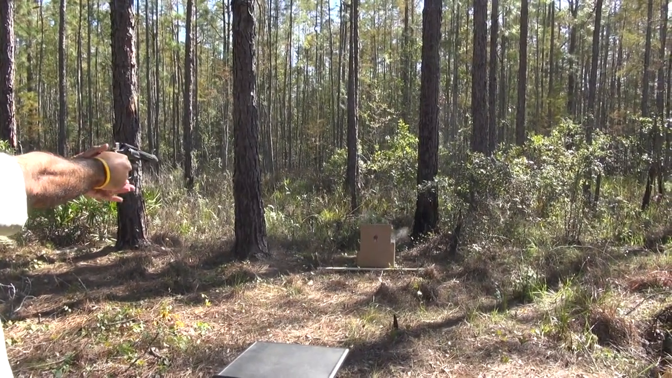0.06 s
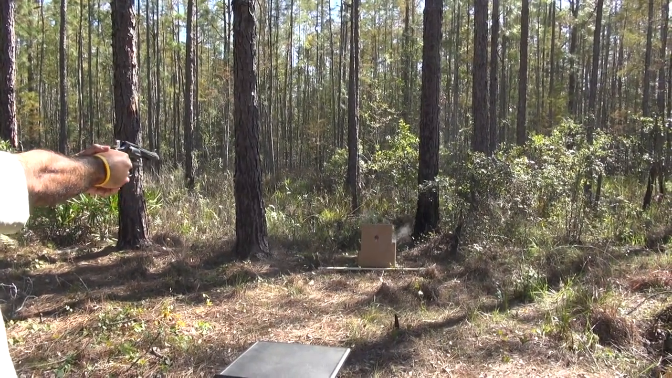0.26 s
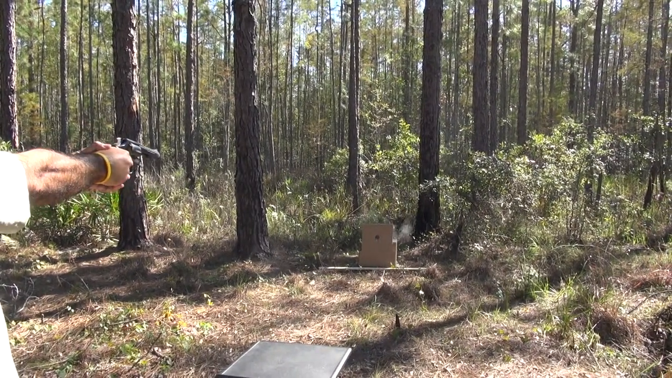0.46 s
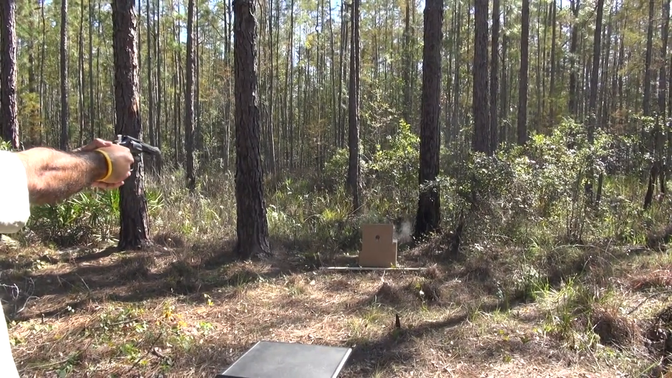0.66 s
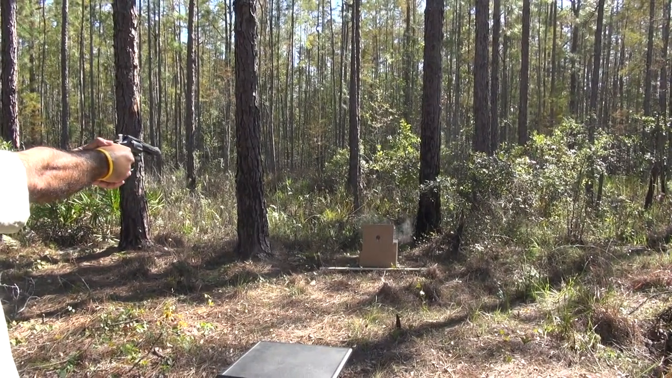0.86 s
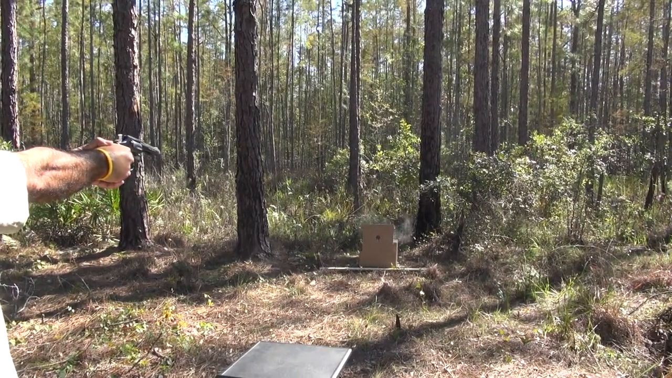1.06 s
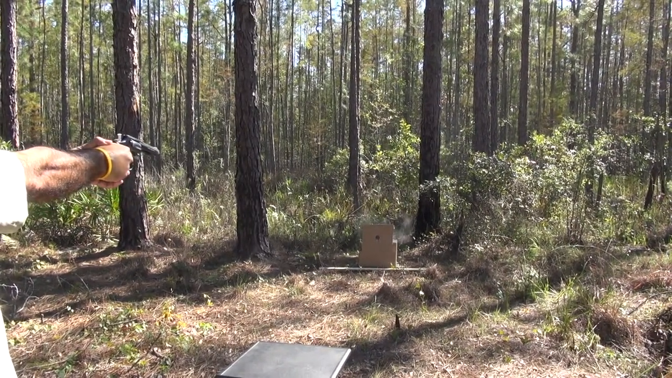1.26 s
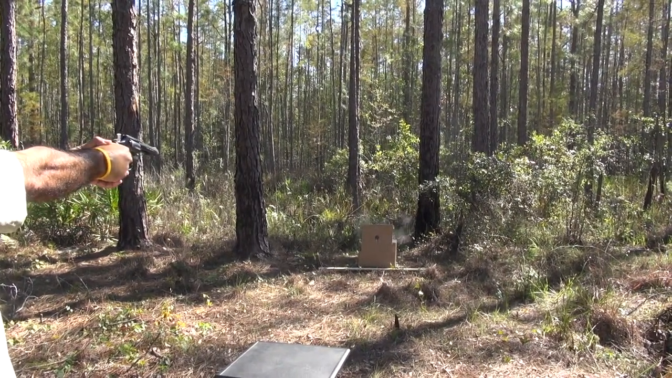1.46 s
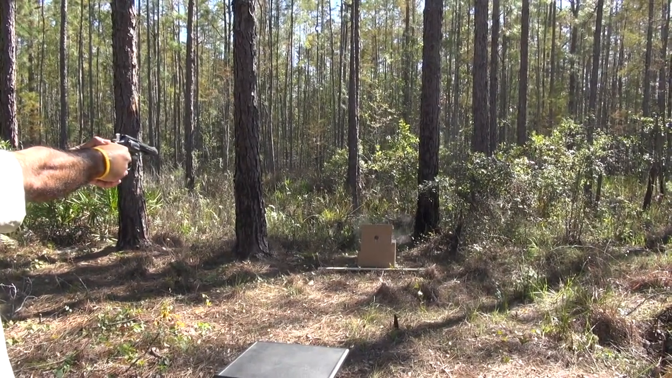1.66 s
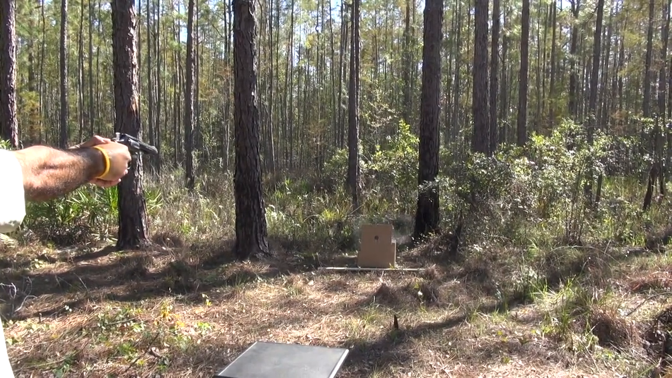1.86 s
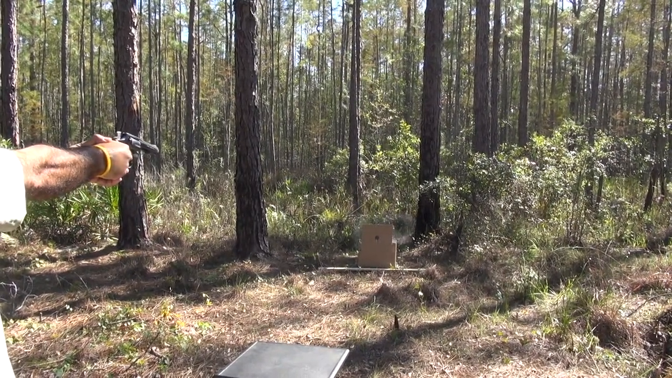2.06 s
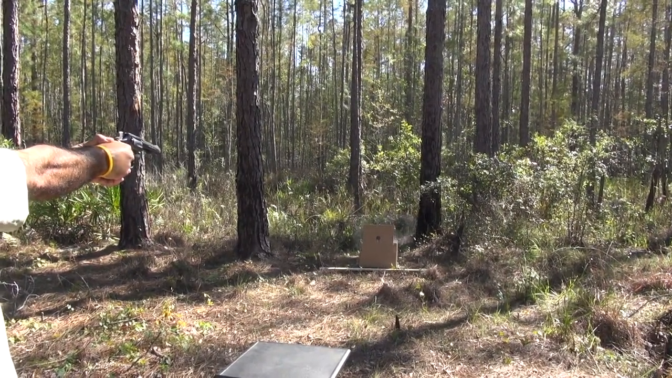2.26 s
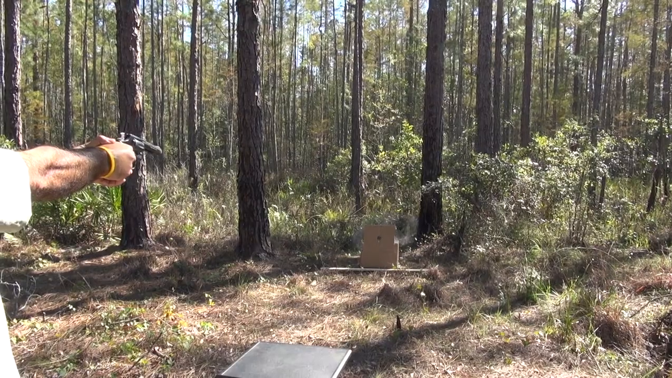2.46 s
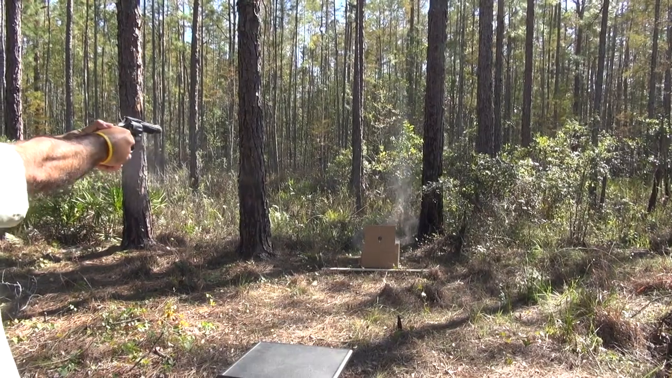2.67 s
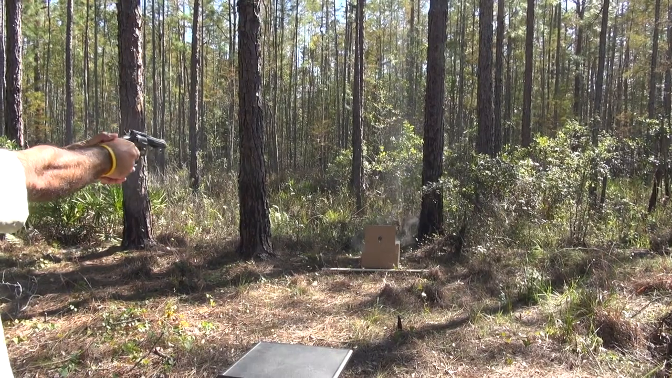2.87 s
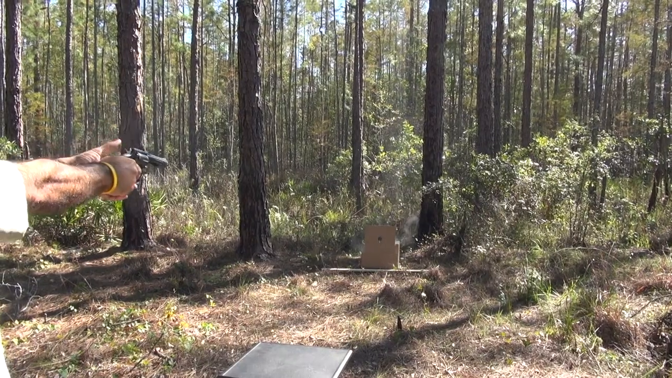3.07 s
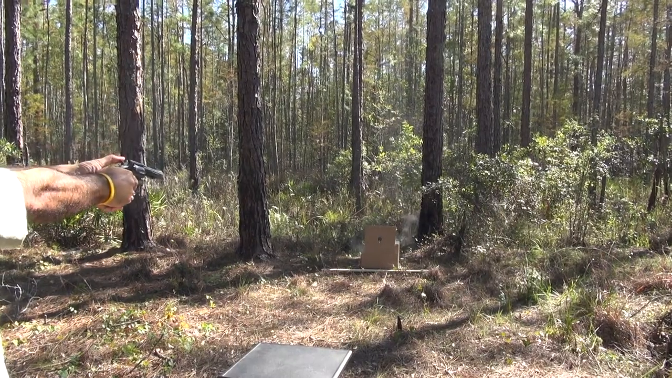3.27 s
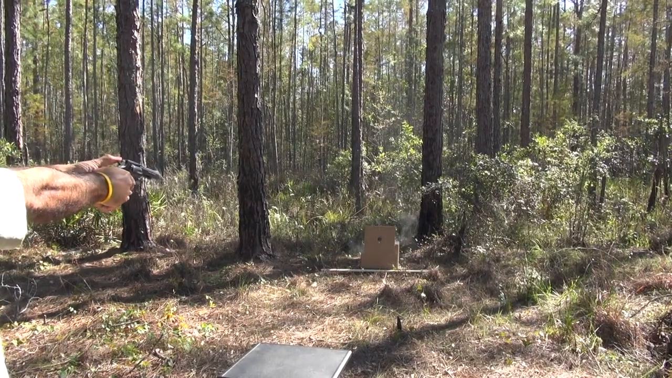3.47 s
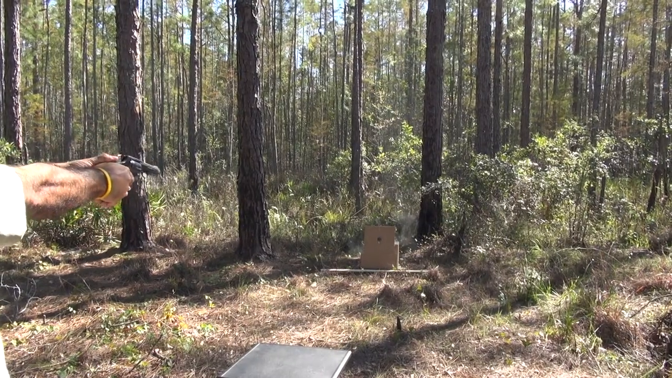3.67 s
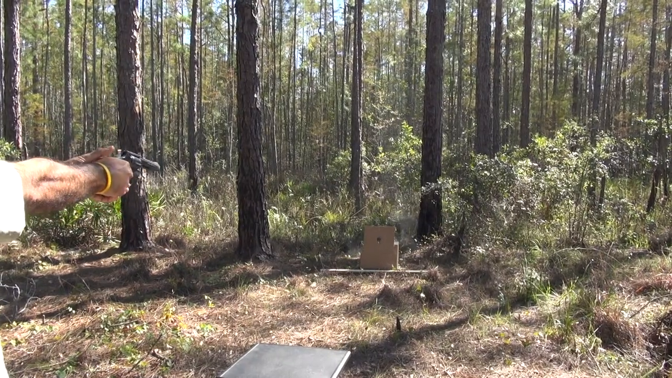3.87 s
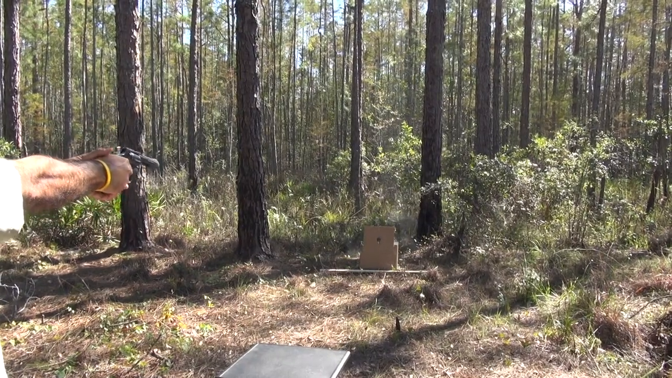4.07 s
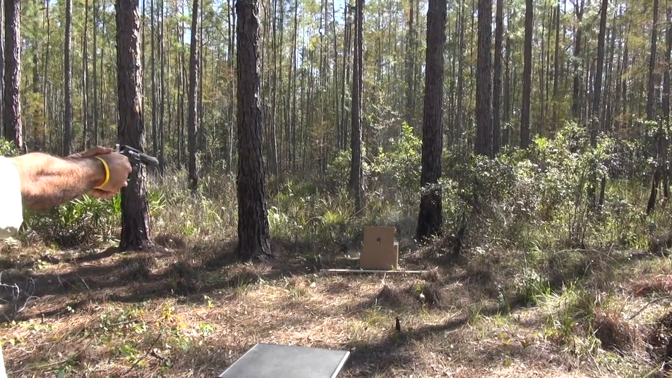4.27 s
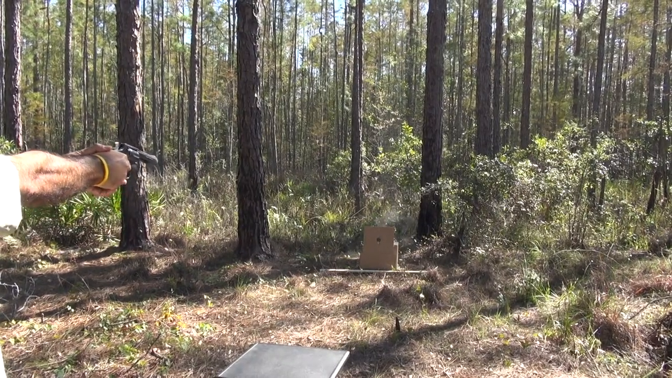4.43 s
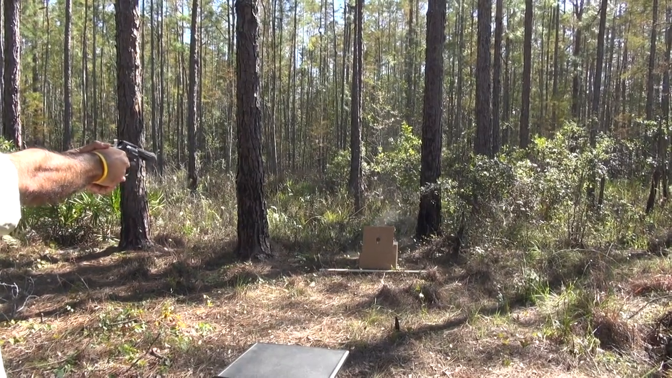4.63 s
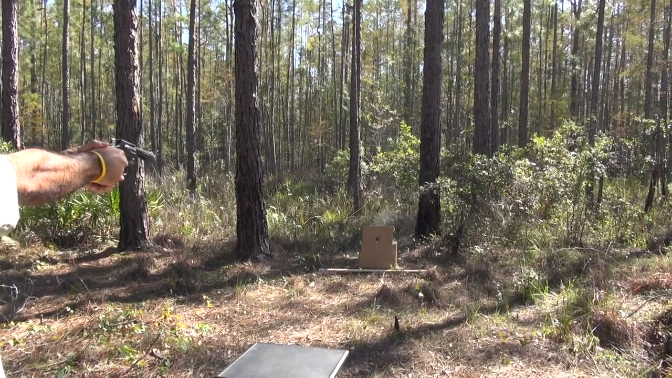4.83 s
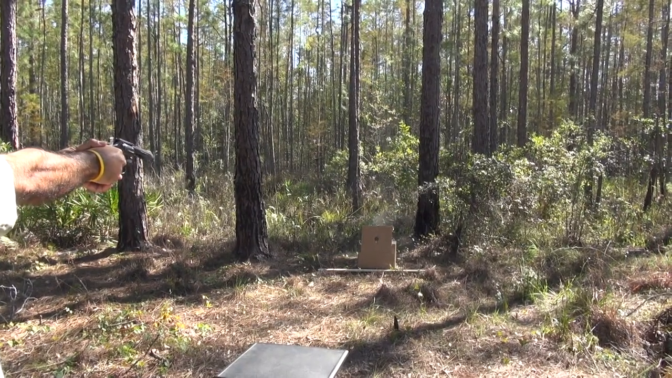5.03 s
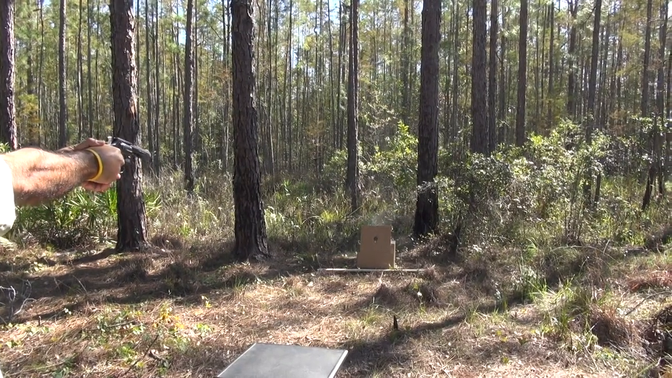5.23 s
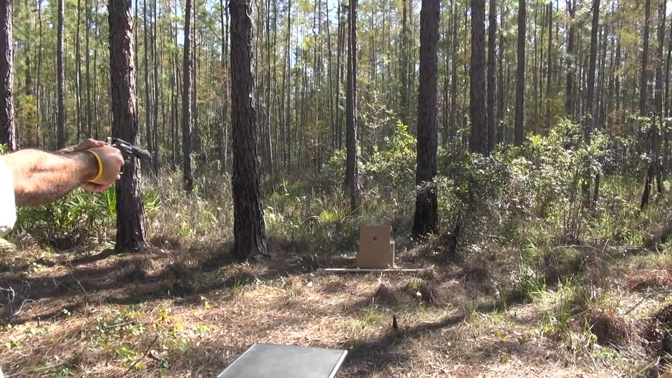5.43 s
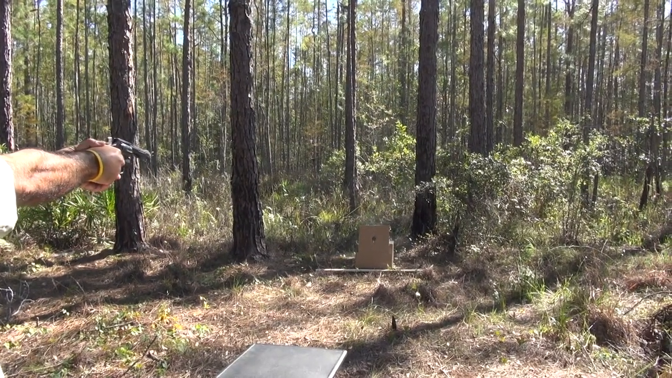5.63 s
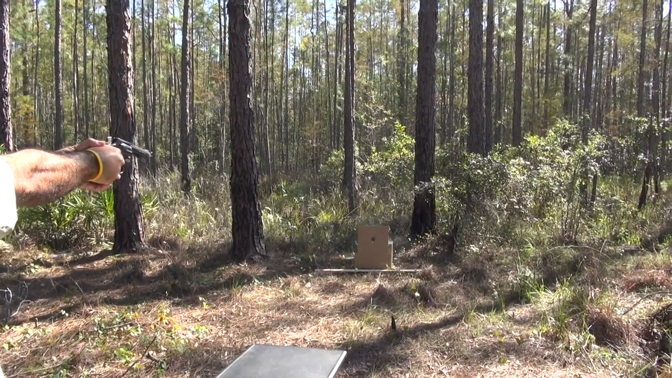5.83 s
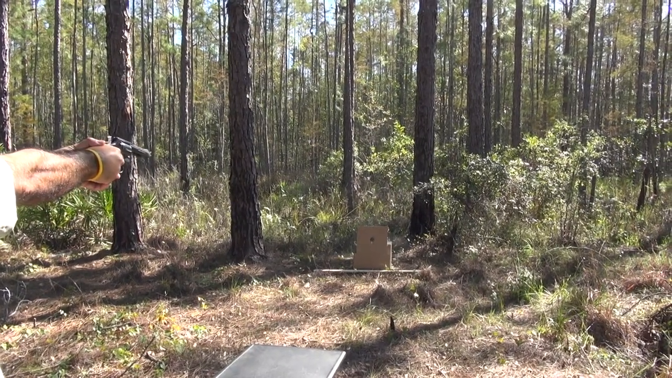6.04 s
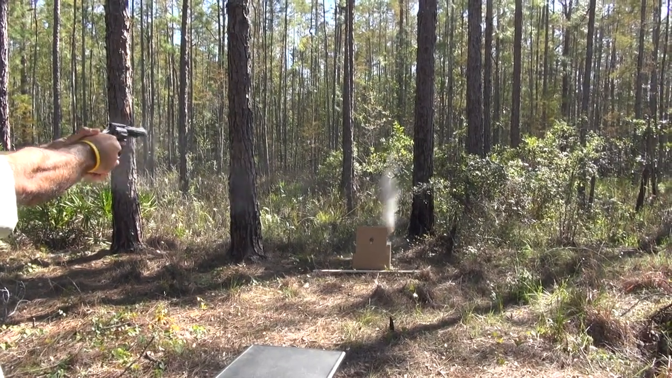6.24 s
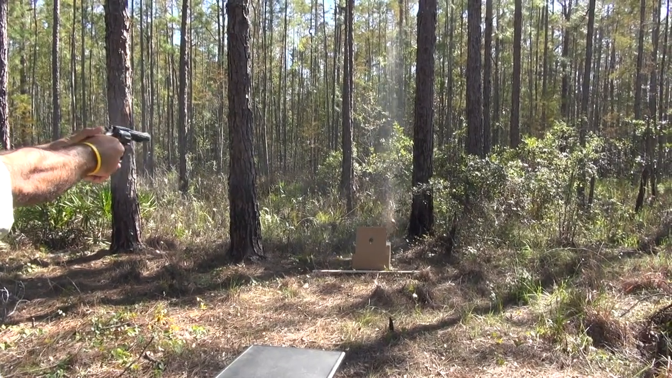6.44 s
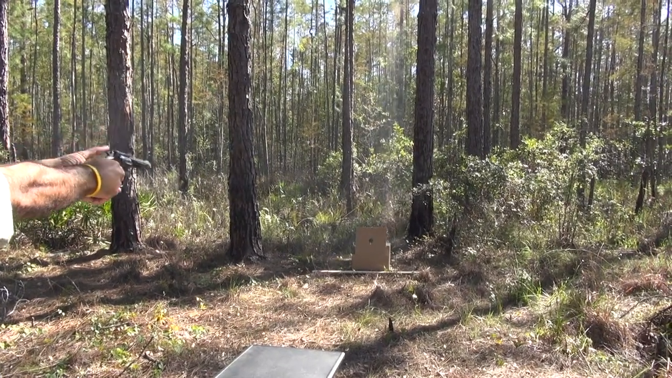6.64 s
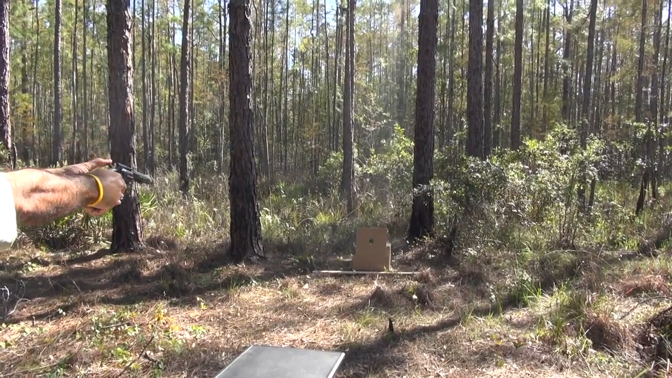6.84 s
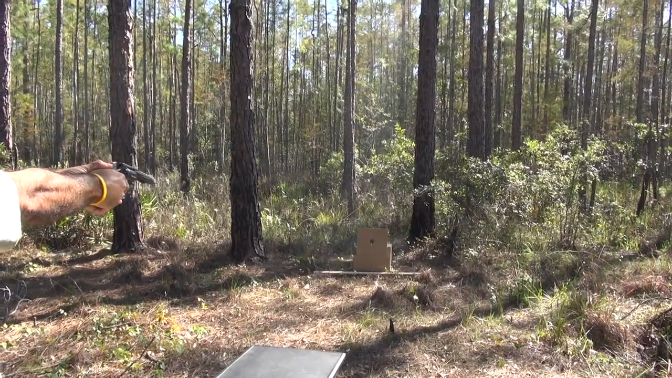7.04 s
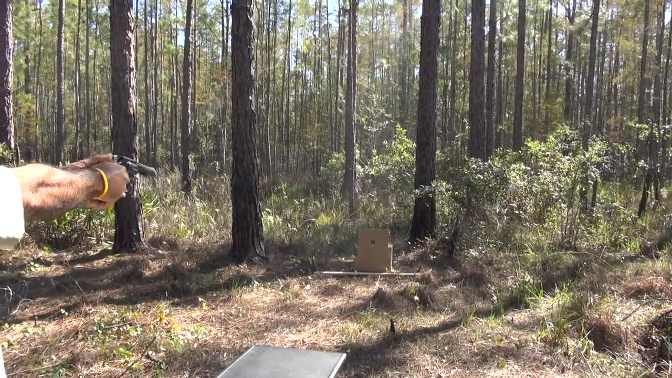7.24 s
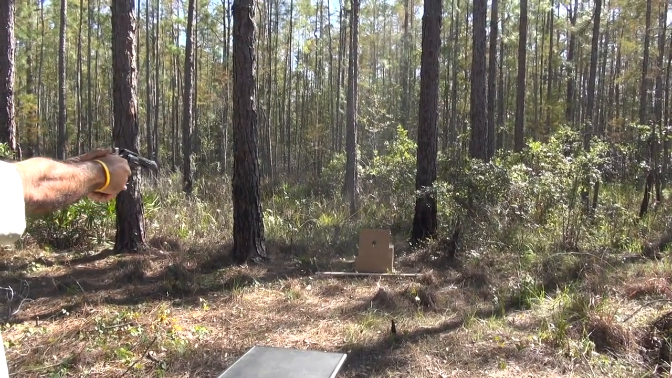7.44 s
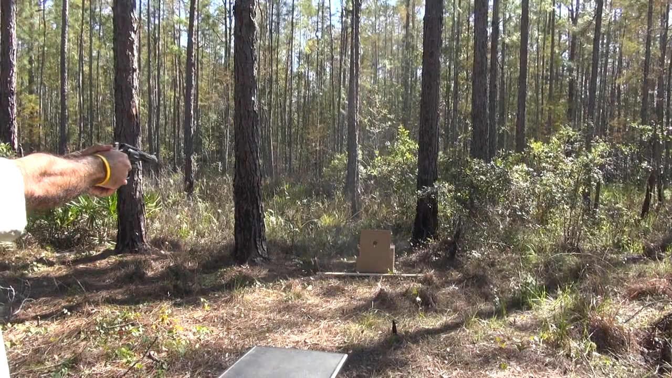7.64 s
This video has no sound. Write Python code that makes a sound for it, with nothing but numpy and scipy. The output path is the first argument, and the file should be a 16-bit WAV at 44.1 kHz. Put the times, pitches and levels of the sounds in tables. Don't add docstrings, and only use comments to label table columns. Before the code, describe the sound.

The fading roar of an earlier gunshot, then two loud, overloaded handgun blasts among trees, each followed by metallic cocking clicks and long echoes.

```python
import sys
import numpy as np
from scipy import signal
from scipy.fft import rfft, irfft, next_fast_len
from scipy.io import wavfile
from scipy.ndimage import uniform_filter1d, map_coordinates

SR = 44100
rng = np.random.default_rng(int(sys.argv[2]) if len(sys.argv) > 2 else 0)


def file_out(sig):
    cols = np.atleast_2d(sig).T
    lim = np.clip(cols, -1, 1)
    pcm = np.round(lim * 32767).astype(np.int16)
    wavfile.write(sys.argv[1], SR, pcm)


def to_linear_factor(level_db):
    exponent = np.asarray(level_db, float) / 20
    return 10 ** exponent


N = 339570

# [t/s, crack level/dB, roar level/dB]
SHOTS = [
    (-1.78, -120, .3),
    (2.517, -15, .1),
    (6.197, -14.5, .2),
]
# [f/Hz, density/dB per Hz]
OVERLOAD_COLOUR = [(60, -32), (150, -5.5), (430, -1), (2000, -4), (2900, -6.5), (3650, -11), (5500, -18.5),
                   (6100, -30), (6600, -42), (9000, -46.5), (16000, -58)]
# [f/Hz, density/dB per Hz]
CRACK_COLOUR = [(300, -26.5), (1500, 0), (4000, -5.5), (6500, -2.5), (9000, -10), (13000, -13),
                (16500, -23)]
# [delay/s, level/dB, f/Hz]
TRUNK_ECHOES = [(.0035, -13, 500), (.0068, -10, 900), (.012, -14, 1600), (.018, -13, 1500),
                (.0225, -17, 1700), (.0312, -11, 1150), (.0365, -15, 450), (.0405, -14, 1300),
                (.0445, -17, 700), (.0525, -15, 900)]

# [f/Hz, density/dB per Hz]
NEAR_COLOUR = [(18, -52), (40, -10), (300, -5), (800, -10.5), (1800, -3), (2600, -8.5), (4200, -14),
               (6500, -8), (9000, -12), (12300, -14), (16500, -26.5)]
# [f/Hz, t60/s]
NEAR_T60 = [(40, 0.32), (300, 0.9), (1000, 0.13), (2500, 0.16), (6000, .25), (10000, 0.24), (16000, 0.22)]
# [f/Hz, density/dB per Hz]
ROAR_COLOUR = [(18, -94), (40, -57), (72, -26), (153, -1.5), (234, -7), (350, -8), (461, -6.5), (689, -3),
               (1170, -7), (1660, -10), (3000, -21), (5250, -33), (8500, -45), (12000, -61.5), (16500, -91)]
# [f/Hz, loss/dB per s]
EARLY_LOSS = [(40, 21), (100, -13.5), (170, -21.5), (300, 5), (650, -8.5), (1000, -4), (1500, -1),
              (2200, 3), (3100, 10.5), (4500, 19), (6700, 38), (9400, 46), (12000, 65.5), (14500, 74.5),
              (16500, 83.5)]
# [f/Hz, loss/dB per s]
LATE_LOSS = [(40, 5.5), (100, -7.5), (170, 11.5), (260, 8), (400, 0), (650, 0.5), (1000, 3), (1500, 5),
             (2200, 7), (3100, 13), (4500, 23.5), (6700, 15), (10000, 39)]
# [f/Hz, correlation]
ROAR_LIKENESS = [(60, 1), (300, 0.99), (1000, 0.97), (4000, 0.98), (6000, 0.91), (11000, 0.51)]
# [f/Hz, left minus right level/dB]
ROAR_BALANCE = [(60, -2.5), (200, -2.5), (300, -3), (500, -0.5), (1400, -1), (2500, 0), (10000, 0)]
# [f/Hz, width/Hz, level/dB]
SWELL_MODES = [(513, 79, 6), (772, 290, 6)]
SWELL_DELAY_S, SWELL_WIDTH_S, SWELL_DB = .243, .043, -23
PLATEAU_DB, BUILD_DB, BUILD_S = -20.5, 26.5, .026
HOLD_S, SAG_DB_PER_S, NEAR_DB_PER_S = 0.31, 12.5, 21.5
DEEP_DB, DEEP_DB_PER_S = -9.5, 9.5
EDGE_S, EDGE_DB_PER_S = 3, 7.5

# [t/s of the sear catching, peak level/dB, time stretch]
COCKINGS = [
    (3.5778, -25.5, 1.0),
    (7.0264, -21, .62),
]
# [t/s from the catch, level/dB re peak, f/Hz]
LOCKWORK = [
    (-.0424, -27.5, 5750),
    (-.02, -13.5, 6370),
    (-.0114, -17, 13200),
    (0, -0.5, 7240),
    (.0076, -11, 7950),
    (.0126, -9.5, 7750),
    (0.02, -11, 5200),
    (0.0316, -25, 7630),
]
# [t/s, peak level/dB, f/Hz]
HANDLING_TICKS = [(.0393, -51, 4600), (.0982, -53, 8970), (.1121, -51, 6510), (.2728, -53, 7850),
                  (.3616, -50, 9360), (1.9215, -54, 4500), (3.681, -56, 8370), (3.7035, -49, 6310),
                  (3.7414, -45.5, 4860), (3.7924, -55, 8720), (3.8866, -53, 9760), (3.9838, -52, 7190),
                  (4.0094, -49, 7750), (4.2158, -51, 7360), (4.2552, -52, 7620), (4.4494, -50, 8930),
                  (4.6803, -50, 4900), (4.7194, -51, 9140), (4.9013, -50, 5000), (4.9144, -47, 10000),
                  (7.1412, -46, 5110), (7.3294, -52, 6820), (7.3674, -49, 7110), (7.4989, -41, 7200),
                  (7.5208, -39.5, 6970), (7.5474, -51, 8810), (7.5707, -49, 7780), (7.5956, -34, 5000),
                  (7.637, -49, 6510), (7.652, -51.5, 6900)]
# [t/s, peak level/dB, f/Hz, t60/s, frame ring level/dB]
DEBRIS = [
    (2.889, -34.5, 11540, 0.013, -16.5),
    (2.898, -40, 12500, 0.0305, -21.5),
]
# [f/Hz, width/Hz, level/dB]
STEEL_MODES = [(3440, 930, -0.5), (4670, 740, -0.5), (7600, 290, -4.5), (12500, 1500, -10)]
TICK_T60_S = 0.0041
RING_DB, RING_GROWTH = -1, .4
CREAK_DB, CREAK_HZ, CREAK_SPREAD_DB = -62.5, 8640, 0

# [t/s, length/s, level/dB]
MOVES = [
    (.06, 0.3, -82),
    (3.42, .26, -76.5),
    (3.9, 0.45, -77),
    (4.35, 0.22, -76),
    (4.576, .37, -75),
    (4.95, 0.6, -83),
    (6.9, 0.3, -71.5),
    (7.22, 0.18, -69),
    (7.42, 0.25, -70),
]
# [f/Hz, density/dB per Hz]
CLOTH_COLOUR = [(1500, -17), (3500, -6.5), (7000, -4), (11000, -6.5), (15000, -14), (17000, -31.5)]

# [t/s, length/s, level/dB]
CRICKET = [(.7, .42, -78.5), (1.41, .3, -76.5), (1.99, .28, -77.5), (2.33, .3, -83), (4.3, .5, -81),
           (4.85, .34, -76), (5.35, .5, -75.5), (6.06, .15, -82)]
# [t/s, length/s, level/dB]
KATYDID = [
    (.55, .7, -72.5),
    (4.5, 0.91, -71.5),
]
# [f/Hz, width/Hz, level/dB]
WING_MODES = [(10450, 1900, -8.5), (12350, 2900, -4.5), (13600, 1800, -4.5)]
# [t/s, length/s, f/Hz, level/dB]
BIRD_NOTE = (.404, .013, 2500, -64)
CHORUS_DB = -96

# [f/Hz, density/dB per Hz]
FLOOR_COLOUR = [(15, -66), (25, -37.5), (53, -20), (74, 0), (97, -16.5), (266, -9), (878, -18.5),
                (1090, -13), (1220, -22), (1880, -28.5), (2750, -31), (6210, -31.5), (8370, -28.5),
                (10700, -32.5), (16500, -31)]
# [f/Hz, correlation]
FLOOR_LIKENESS = [(60, 0.87), (180, 0.77), (550, 0.35), (1650, 0.92), (4970, 0.5), (15000, 0.73)]
# [f/Hz, left minus right level/dB]
FLOOR_BALANCE = [(60, 0), (240, -0.5), (950, -6), (3770, 0.5), (15000, -1)]
# [f/Hz, width/Hz, level/dB]
MACHINE_BANDS = [
    (71.7, 14, -78.5),
    (1059, 64, -76),
]
FLOOR_DB = -62.5
# [f/Hz, time/s]
BACKGROUND_RECOVERY = [(1000, .6), (9000, .65), (13000, 0.51), (16000, 1.6)]
MONO_HZ, TOP_HZ, SIDE_LEAK_DB = 11400, 16650, -18


def blast():
    out = np.zeros((2, N))
    t = np.arange(SR // 20) / SR
    n = len(t)
    for s, db, _ in SHOTS[1:]:
        held = np.clip(np.minimum(t / .002, (.0125 - t) / .0015), .06 * (t < .0143), 1)
        choked = rush(OVERLOAD_COLOUR, [(300, -0.8), (1000, -1.0), (5000, 0.21)], n)
        add(out, s - .0143, to_linear_factor(-17.5) * held * choked)
        onset = t / 0.018 * (t < .007)
        add(out, s - .021, to_linear_factor(-45.5) * onset * rush(OVERLOAD_COLOUR, [(1000, .3)], n))
        crack = np.clip((.0024 - t) / 0.0011, 0, 1) * rush(CRACK_COLOUR, [(1000, 1.0)], n)
        add(out, s, to_linear_factor(db) * crack)
        decay = to_linear_factor(db + 2.0 - 60 * t / 0.04) * np.minimum(t / 0.004, 1)
        add(out, s + 0.0053, decay * rush(CRACK_COLOUR, [(1000, .87)], n))
        for delay, echo_db, hz in TRUNK_ECHOES:
            wavelet = -np.sin(2 * np.pi * hz * t) * hz * t * np.exp(1 - .9 * hz * t)
            side = lean(np.clip(8 * np.log2(hz / 1150), -10, 4))
            add(out, s + delay - 1 / hz, to_linear_factor(-9.0 + echo_db + rng.normal(0, 1)) * side * wavelet)
    return out


def roar(middle_s, lumpy_db):
    out = np.zeros((2, N))
    for s, _, db in SHOTS:
        def loss_db(hz, t):
            older = np.maximum(t - s, 0) - middle_s
            rate = np.where(older < 0, along(EARLY_LOSS, hz), along(LATE_LOSS, hz))
            return rate * older + lumpy_db * patches(hz, t, 30, 2)

        out += fading(rush(ROAR_COLOUR, ROAR_LIKENESS), loss_db, size=1024) * answer(s, db)
    t = np.arange(SR) / SR
    near_likeness = [(100, .6), (400, .8), (1500, 0.31), (3000, 1.0), (8000, 0.69)]
    for s, *_ in SHOTS[1:]:
        near = rush(NEAR_COLOUR, near_likeness, SR)
        near = fading(near, lambda hz, t: 60 * t / along(NEAR_T60, hz), size=256)
        add(out, s + 0.0022, to_linear_factor(-16.5) * near * np.minimum(t / 0.0035, 1))
        boom = unit(filtered(rush([(600, 0)], ROAR_LIKENESS, SR), lambda f: modes(SWELL_MODES)(f) ** 2))
        add(out, s, to_linear_factor(SWELL_DB - ((t - SWELL_DELAY_S) / SWELL_WIDTH_S) ** 2) * boom)
    return filtered(out, lambda hz: lean(along(ROAR_BALANCE, hz)))


def answer(s, db):
    age = np.maximum(np.arange(N) / SR - s, 0)
    near_db = -SAG_DB_PER_S * age - NEAR_DB_PER_S * np.maximum(age - HOLD_S, 0)
    deep_db = DEEP_DB - DEEP_DB_PER_S * age - EDGE_DB_PER_S * np.maximum(age - EDGE_S, 0)
    build = to_linear_factor(PLATEAU_DB + db - BUILD_DB * np.exp(-age / BUILD_S))
    return (age > 0) * build * np.hypot(to_linear_factor(near_db), to_linear_factor(deep_db))


def clicks():
    out = np.zeros((2, N))
    t = np.arange(3000) / SR
    for s, db, hz, t60, steel_db in contacts(count=40) + list(DEBRIS):
        decay = to_linear_factor(-60 * t / t60) + to_linear_factor(-13.5 - 60 * t / 0.042)
        puff = rng.standard_normal(len(t)) * decay * (1 - np.exp(-t / 0.00017))

        def response(f):
            body = modes([(hz, .9 * hz, 0)])(f) ** 2 + to_linear_factor(steel_db) * modes(STEEL_MODES)(f)
            return body / (1 + (f / 12500) ** 6)

        tick = filtered(puff, response)
        add(out, s + 0.00066, to_linear_factor(db - 1) * lean(2.4) * tick / np.abs(tick).max())
    return out


def contacts(count):
    lock = [(s + stretch * delay, db + under, hz)
            for s, db, stretch in COCKINGS for delay, under, hz in LOCKWORK]
    moves = np.array(MOVES)[np.arange(count) % len(MOVES)]
    luck = rng.uniform(size=(count, 3))
    creak_s = moves[:, 0] + moves[:, 1] * luck[:, 0]
    creak_db = CREAK_DB + .5 * (moves[:, 2] + 78) - CREAK_SPREAD_DB * np.log(luck[:, 1])
    creak_hz = CREAK_HZ * 2 ** (luck[:, 2] - .5)
    every = lock + list(HANDLING_TICKS) + list(zip(creak_s, creak_db, creak_hz))
    return [(s, db, hz, TICK_T60_S, RING_DB + RING_GROWTH * (db + 37)) for s, db, hz in every]


def rustle():
    grains = to_linear_factor(1.4 * map_coordinates(rng.standard_normal(600), [np.linspace(0, 598, N)]))
    cloth = rush(CLOTH_COLOUR, [(5000, 1.0), (12000, 0.88)])
    cloth = fading(cloth, lambda hz, t: 3 * patches(hz, t, 40, 5), size=512)
    return phrases(MOVES, swell_db=-1.0, rise_s=0.068, stop_s=.06) * to_linear_factor(5.0) * unit(grains * cloth)


def insects():
    cricket = trill(68.2, 0.52, [(8060, 900, 0), (8950, 900, 0.95)])
    cricket_gain = phrases(CRICKET, swell_db=6.5, rise_s=.12, stop_s=0.037) + to_linear_factor(CHORUS_DB)
    katydid = trill(56.3, 0.71, WING_MODES)
    katydid_gain = phrases(KATYDID, swell_db=6, rise_s=.25, stop_s=.04)
    out = cricket_gain * cricket * lean(3) + katydid_gain * katydid
    s, length, hz, db = BIRD_NOTE
    t = np.arange(round(length * SR)) / SR
    add(out, s, to_linear_factor(db) * np.hanning(len(t)) * np.sin(2 * np.pi * hz * t))
    return out


def trill(rate, sharp, body):
    strokes = (.5 + .5 * np.sin(2 * np.pi * rate * np.arange(N) / SR)) ** sharp
    return unit(filtered(strokes * rng.standard_normal(N), lambda f: modes(body)(f) ** 2))


def air():
    hum = 0
    for hz, width, db in MACHINE_BANDS:
        band = filtered(rng.standard_normal(N), lambda f: modes([(hz, width, 0)])(f) ** 2)
        hum = hum + to_linear_factor(db) * unit(band)
    floor = filtered(rush(FLOOR_COLOUR, FLOOR_LIKENESS), lambda hz: lean(along(FLOOR_BALANCE, hz)))
    return to_linear_factor(FLOOR_DB - 1.5) * floor + hum * to_linear_factor([[-3.5], [2.5]])


def ducked(x, depth_db):
    def loss_db(hz, t):
        depth = depth_db * (1 + (hz / 13000) ** 4)
        return sum(depth * (t > s) * np.exp(-((t - s) / along(BACKGROUND_RECOVERY, hz)) ** 2) for s, *_ in SHOTS)

    return fading(x, loss_db, size=512)


def phrases(rows, swell_db, rise_s, stop_s):
    t = np.arange(N) / SR
    gain = 0
    for s, length, db in rows:
        swell = to_linear_factor(db - swell_db * np.clip(1 - (t - s) / length, 0, 1))
        gain = gain + swell * np.clip(np.minimum((t - s) / rise_s, 1 + (s + length - t) / stop_s), 0, 1)
    return gain


def rush(spectrum, alike, n=N):
    def response(hz):
        turn = np.arccos(np.clip(along(alike, hz), -1, 1)) / 2
        return to_linear_factor(along(spectrum, hz)) * [np.cos(turn), np.sin(turn)]

    mid, side = filtered(rng.standard_normal((2, n)), response)
    return unit(np.array([mid + side, mid - side]))


def fading(noise, loss_db, size):
    hz, t, z = signal.stft(noise, SR, nperseg=size)
    return signal.istft(z * to_linear_factor(-loss_db(hz[:, None], t)), SR, nperseg=size)[1][:, :noise.shape[1]]


def patches(hz, t, bins, frames):
    luck = rng.standard_normal((len(hz), len(t)))
    return unit(uniform_filter1d(uniform_filter1d(luck, size=bins, axis=0), size=frames))


def modes(table):
    return lambda f: sum((-1) ** k * to_linear_factor(db) * 1j * f * w / (c * c - f * f + 1j * f * w)
                         for k, (c, w, db) in enumerate(table))


def filtered(x, response):
    n = x.shape[-1]
    m = next_fast_len(n + 4096)
    return irfft(rfft(x, m) * response(np.fft.rfftfreq(m, 1 / SR)), m)[..., :n]


def along(points, hz):
    f, v = np.transpose(points)
    return np.interp(np.log(hz + 1), np.log(f + 1), v)


def lean(left_minus_right_db):
    return to_linear_factor(left_minus_right_db * np.array([[.5], [-.5]]))


def unit(x):
    return x / np.sqrt(np.mean(x ** 2) + 1e-20)


def add(out, s, x):
    i = max(round(s * SR), 0)
    out[..., i:i + x.shape[-1]] += x[..., :N - i]


def scene():
    shots = blast() + roar(middle_s=0.54, lumpy_db=1.0)
    return shots + clicks() + rustle() + ducked(insects() + air(), depth_db=5.5)


def low_pass(x):
    return signal.sosfilt(signal.butter(12, 17410, fs=SR, output="sos"), x)


def record(dry):
    left, right = dry / (1 + np.abs(dry / .5) ** 4) ** .25

    def passed(hz):
        bass_cut = (1j * hz / (1j * hz + 40)) ** 2
        below_top = hz < TOP_HZ
        side_gain = np.where(hz < MONO_HZ, 1, to_linear_factor(SIDE_LEAK_DB))
        return np.array([below_top, below_top * side_gain]) * bass_cut

    mid, side = filtered(np.array([left + right, left - right]) / 2, passed)
    return low_pass(np.array([mid + side, mid - side]))


dry = scene()
out = record(dry)
file_out(out)
```